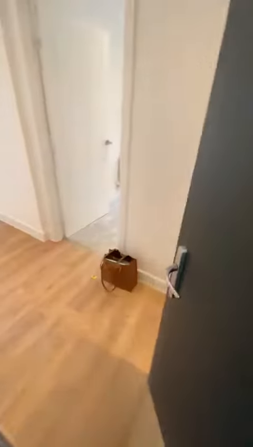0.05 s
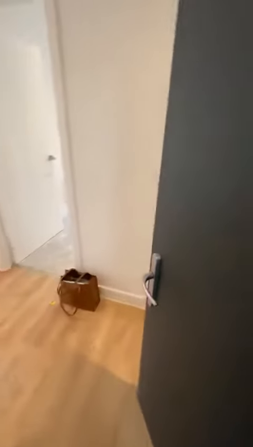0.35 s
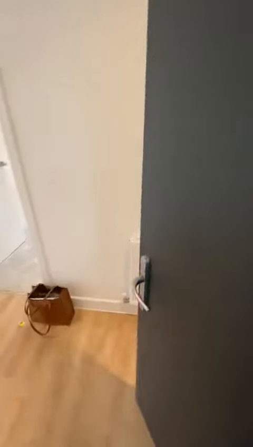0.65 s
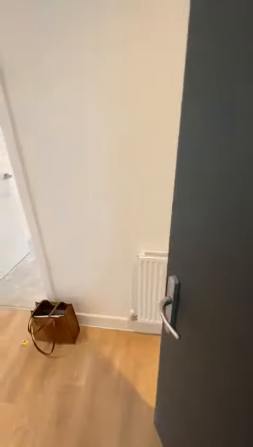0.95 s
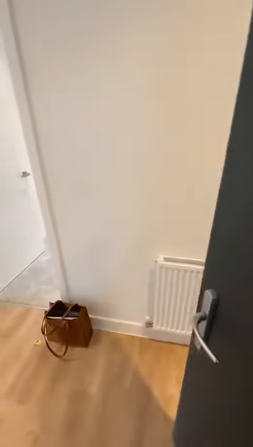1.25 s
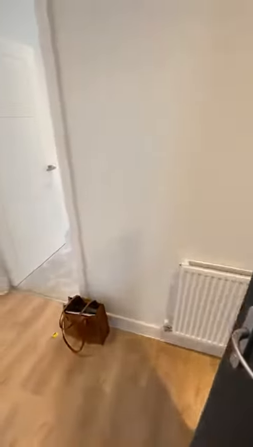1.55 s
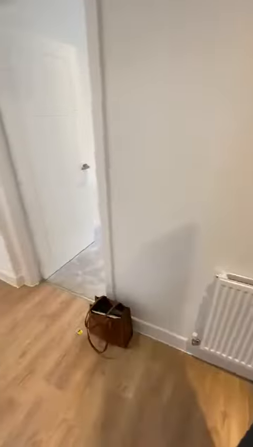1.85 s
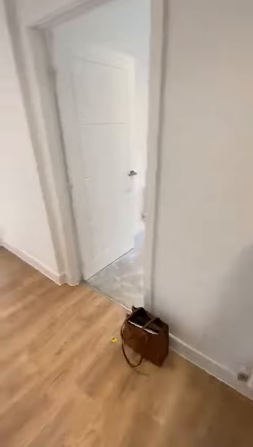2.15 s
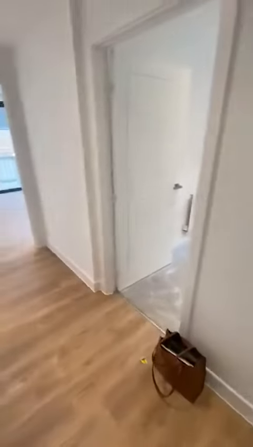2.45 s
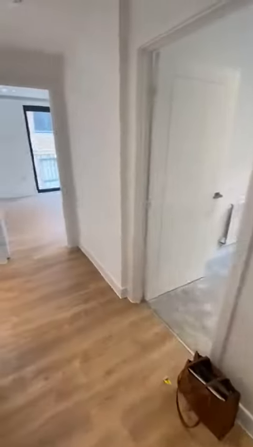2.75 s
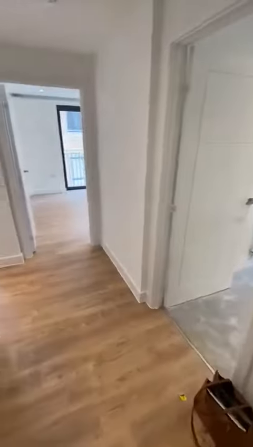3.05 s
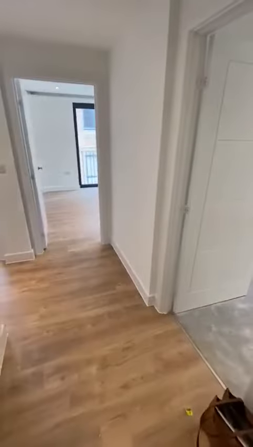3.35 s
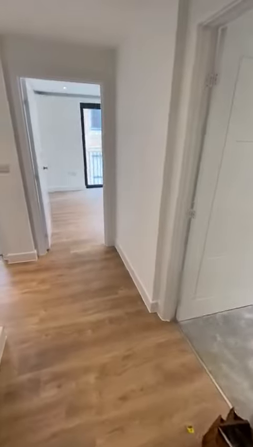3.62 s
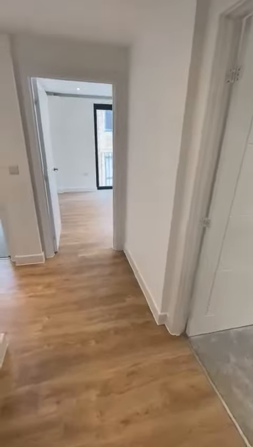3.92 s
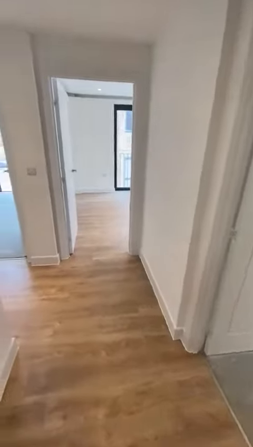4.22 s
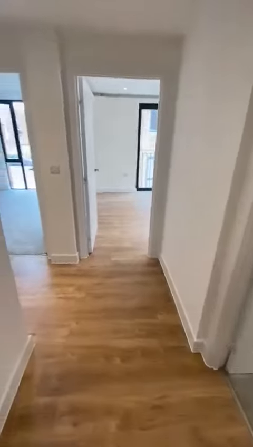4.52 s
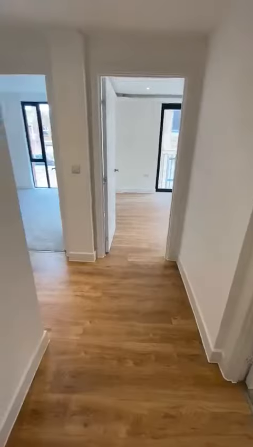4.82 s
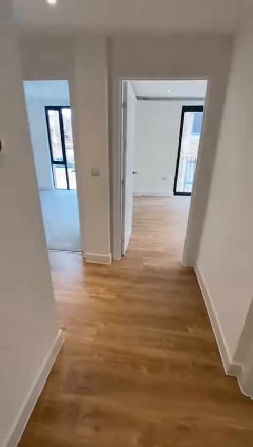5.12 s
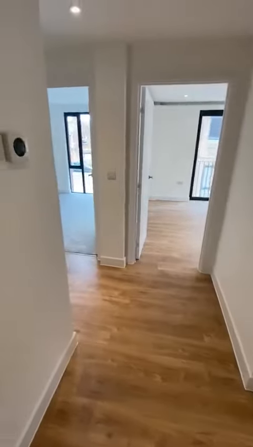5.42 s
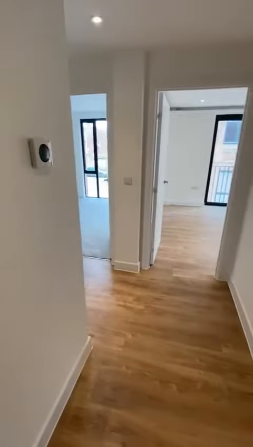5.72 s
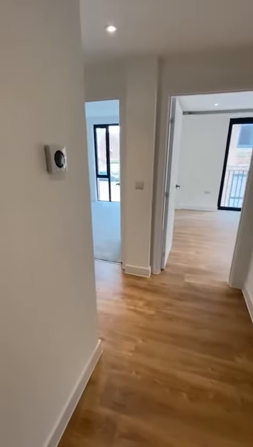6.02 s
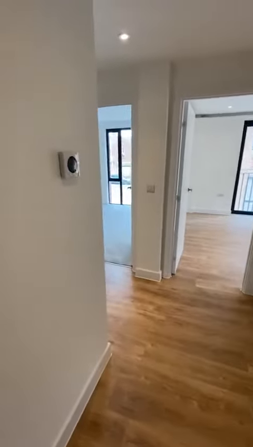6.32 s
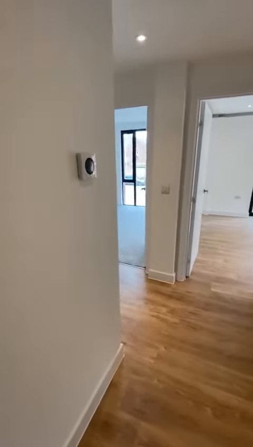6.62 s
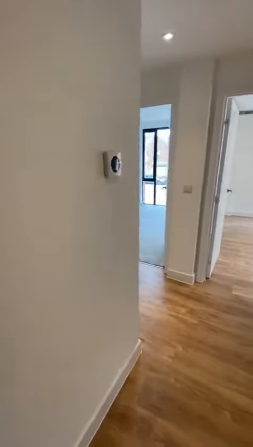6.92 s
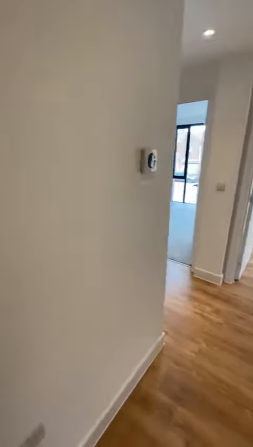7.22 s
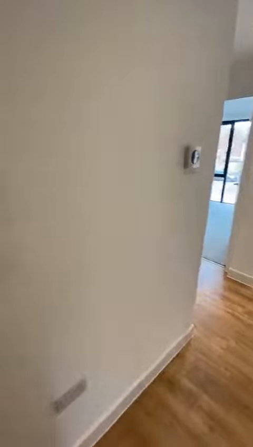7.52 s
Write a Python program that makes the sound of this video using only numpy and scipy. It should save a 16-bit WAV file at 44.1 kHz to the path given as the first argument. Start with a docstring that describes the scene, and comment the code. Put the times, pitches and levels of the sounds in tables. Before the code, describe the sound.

A front door clicks open, knocks three times, scrapes slowly shut and slams into its latch in an echoing hallway, with soft footsteps.

```python
"""A fan hums in a bare hallway with a hard floor. Someone carrying a phone works the lever handle
of a heavy front door, and the steel clacks back. The door is pushed open and, after two seconds,
knocks three times at the end of its swing. Then it sweeps slowly shut, its seal hissing and scraping
over the floor, while soft footsteps pass. Just after seven seconds it pushes a puff of air past
the phone and the latch slams home, metal on metal, echoing down the hallway."""
import sys
import numpy as np
from scipy import signal
from scipy.fft import rfft, irfft, next_fast_len
from scipy.io import wavfile

SR = 44100
rng = np.random.default_rng(int(sys.argv[2]) if len(sys.argv) > 2 else 0)


def wav_record(signal):
    """Record a signal, one row per channel, as 16-bit PCM in the file named by sys.argv[1]."""
    frames = np.transpose(np.atleast_2d(signal))
    bounded = np.clip(frames, -1, 1)
    # unit amplitude maps onto the largest positive 16-bit level
    quanta = np.round(bounded * 32767).astype(np.int16)
    wavfile.write(sys.argv[1], SR, quanta)


N = 342216
T = np.arange(N) / SR
SIZE = next_fast_len(N + SR, True)  # a spare second leaves space for echoes
FREQS = np.arange(SIZE // 2 + 1) * SR / SIZE

# Levels are relative: each layer gets its final loudness in the functions below.
# A TONE table says how strong a noise is at each pitch. MODES are the notes a struck thing rings with.
FAN_LEVELS = [(0.5, -61), (1.12, -69), (1.19, -53), (1.37, -57.5), (2.32, -60), (2.37, -48), (2.48, -52.5),
              (3.96, -48), (6.858, -53.5), (6.9, -55)]  # how loud the fan hums: time_s, level_db
AIR_TONE = [(25, -29), (50, 2), (85, 10.5), (130, -7), (240, -7), (500, -15.5), (1000, -34), (2500, -36.5),
            (3500, -39.5), (6000, -39), (11000, -46)]  # the rush of the fan's air: pitch_hz, level_db
ECHO_FADES = [(80, 0.8), (240, 1.08), (500, 0.78), (1000, 0.93), (2500, 0.79), (4000, 0.6), (6000, 0.63),
              (11000, 0.18)]  # how long the hallway's echo takes to fall 60 dB: pitch_hz, fade_s
HAND_BUMPS = [(.001, -15, 73.5), (.028, -26.5, 118), (0.097, -22, 77.6), (0.128, -25, 65), (0.277, -35, 93),
              (0.302, -32.5, 71.4), (0.348, -33.5, 69), (6.015, -36.5, 80), (6.166, -41, 97),
              (6.348, -37, 108)]  # the hand bumps the phone: start_s, level_db, pitch_hz
SLEEVE_BRUSHES = [(0, 0.0084, -52.5), (.08, 0.18, -68.5), (7.42, 0.19, -52.5), (7.6, 0.15, -59.5)]  # a sleeve brushes as the arm moves: start_s, length_s, level_db
CLOTH_TONE = [(400, 14.5), (1800, 14), (4000, 5.5), (6200, 2.5), (7500, -13), (11000, -8.5)]  # the rustling sleeve: pitch_hz, level_db
DRAUGHT_TONE = [(15, -14), (35, 1.5), (75, 2), (130, -23), (400, -27), (2000, -79)]  # air blowing on the phone: pitch_hz, level_db

FOOTSTEPS = [(0.056, -37.5, 225, -41), (0.255, -39, 244, -42.5), (0.388, -33, 107, -58),
             (0.887, -45.5, 261, -56.5), (1.118, -46, 250, -51.5), (1.146, -35.5, 88, -87),
             (1.499, -53.5, 153, -98), (3.128, -40.5, 147, -53.5), (3.619, -29.5, 144, -49.5),
             (4.313, -39.5, 161.6, -48.5), (4.6395, -26, 151.6, -39.5), (6.839, -50, 159, -47),
             (7.11, -43, 158, -40.5), (7.674, -37, 153.4, -50.5)]  # soft steps: start_s, thud_db, thud_pitch_hz, tap_db
SOLE_TONE = [(80, 6.5), (210, 9.5), (340, 5.5), (520, 4.5), (780, -2.5), (1200, -17), (2500, -27),
             (5500, -39), (11000, -40)]  # a sole tapping the floor: pitch_hz, level_db

SEAL_GLIDE = [(2.45, -74, -100), (2.65, -57.5, -56), (2.77, -60, -59.5), (2.921, -92, -93),
              (2.96, -71.5, -62), (3.18, -59, -57), (3.32, -65.5, -69), (3.44, -61.5, -56.5),
              (3.771, -59, -51.5), (3.92, -59, -82), (4.13, -58.5, -99), (4.42, -69.5, -93),
              (4.59, -87, -102), (4.6, -100, -111)]  # the door's seal glides in one long sweep: time_s, hiss_db, treble_db
SEAL_CATCHES = [(0.873, 0.031, -75, -90, -95), (1.006, .29, -62, -66.5, -68),
                (1.757, 0.062, -60.5, -85, -96), (2.749, 0.074, -51, -67, -66.5),
                (3.087, 0.18, -54, -75, -64.5), (3.398, 0.13, -58, -66, -66.5),
                (3.79, 0.076, -51, -58, -78), (4.07, 0.19, -61, -81, -69.5),
                (4.375, 0.05, -54.5, -87, -68.5), (4.53, 0.072, -57.5, -89, -99),
                (4.653, 0.021, -62, -65.5, -79), (4.788, 0.21, -58.5, -75.5, -73),
                (5.03, 0.2, -55, -78.5, -68), (5.21, 0.1, -53, -78.5, -78),
                (5.402, 0.13, -56, -75.5, -70.5), (5.536, 0.19, -49, -68.5, -60),
                (5.786, .14, -48.5, -62.5, -70), (5.972, 0.07, -49.5, -65, -71),
                (6.104, 0.072, -44.5, -66, -75), (6.257, .12, -45.5, -68.5, -60),
                (6.451, 0.06, -50, -71, -68), (6.474, 0.011, -62, -57.5, -68),
                (6.625, 0.18, -59, -75, -74.5), (6.871, 0.19, -51, -71.5, -61.5),
                (7.033, 0.42, -53, -67.5, -57)]  # it catches on the floor: start_s, length_s, scrape_db, hiss_db, rasp_db
SEAL_SNAPS = [(4.548, -46.5), (5.238, -35), (5.555, -43), (5.576, -46), (5.891, -36), (5.994, -48),
              (6.12, -51.5), (6.929, -37), (6.979, -32)]  # it sticks and snaps free: start_s, level_db
SCRAPE_TONE = [(100, -22.5), (300, 6.5), (430, 10.5), (560, 8), (780, 7), (1050, 0.5), (1300, -9.5),
               (1800, -7.5), (2300, -25), (3300, -25.5), (7000, -66)]  # the seal's hollow scrape: pitch_hz, level_db
RASP_TONE = [(500, -23), (900, 4.5), (1150, 4.5), (1600, 0), (2000, -14), (2400, -1), (3000, -17.5),
             (7000, -54)]  # its rough rasp: pitch_hz, level_db
HISS_TONE = [(600, -8), (1800, -3.5), (2400, 2), (3300, -3), (4500, -2), (6000, -1), (7500, -17),
             (10000, -9.5), (12000, -21.5)]  # its hiss: pitch_hz, level_db
TREBLE_TONE = [(5000, -18), (8000, -12), (9500, -16), (12000, -19.5)]  # the highest part of its glide: pitch_hz, level_db
FLICKER_BANDS = [700, 1100, 1600, 2300, 4000, 5000, 6100, 10000]  # parts of the rubbing sound that waver separately: pitch_hz
DRONE_MODES = [(78, 30, -2), (108, 18, 1), (150, 30, -6), (233, 13, 3), (390, 22, 3), (628, 26, -2),
               (700, 16, -6), (805, 40, 0), (1030, 35, -7), (1400, 200, -20), (2230, 120, -23)]  # the dragged door's resonances: pitch_hz, width_hz, level_db

# the door knocks once in its frame, then at the end of its swing: start_s, thud_db, rattle_db, thump_db
DOOR_KNOCKS = [(.378, -36.5, -45, -42), (2.095, -28.5, -48, -25), (2.212, -27, -36, -15.5),
               (2.326, -29, -39.5, -21.5)]
THUD_TONE = [(50, -33), (110, -4.5), (260, -0.5), (460, -7.5), (620, -16.5), (820, -15), (1100, -26.5),
             (2500, -33.5), (6000, -56)]  # the door's dull thud: pitch_hz, level_db
RATTLE_TONE = [(150, -31), (500, 3), (1000, 6.5), (1900, 5), (3100, 0), (4200, -7.5), (6100, -9.5),
               (7400, -26), (10000, -20), (12000, -50)]  # the wooden door rattling on its hinges: pitch_hz, level_db
DOOR_MODES = [(105, 2, .3), (150, 5, .22), (213.4, -12, .7), (263, -14.5, .35), (300, -12, .15),
              (377, -4.5, .22), (410.6, -9, .15), (451, -5.5, .24)]  # the ringing door panel: pitch_hz, level_db, fade_s

LATCH_STRIKES = [(.135, -68, -51), (0.379, -46.5, -46), (.391, -38, -38.5), (1.105, -47, -49),
                 (2.135, -39, -46), (7.215, -25.5, -38), (7.218, -23, -21), (7.223, -24, -30.5),
                 (7.231, -24, -20.5), (7.242, -29, -27)]  # handle and latch strike and shake the frame: start_s, metal_db, frame_db
BOLT_SLIDES = [(.368, 0.016, -49.5), (2.204, 0.011, -56), (2.317, 0.012, -52)]  # the bolt grinds along its plate: start_s, length_s, level_db
FITTING_TICKS = [(.108, -47, 5000, 3500), (0.1368, -39.5, 1700, 3000), (0.137, -27.5, 8800, 2000),
                 (0.381, -52, 9900, 3000), (0.3888, -29.5, 9500, 3030), (0.3909, -28, 3000, 4500),
                 (1.828, -33.5, 2540, 210), (2.07, -47.5, 4500, 6000), (2.136, -26.5, 5000, 2900),
                 (2.136, -25.5, 2300, 1700), (2.139, -30, 9700, 500), (2.21, -39, 9200, 1990),
                 (6.478, -37, 4370, 1590), (7.215, -11, 5700, 800), (7.215, -17.5, 8900, 3000),
                 (7.2175, 2, 2050, 800), (7.2228, -4, 1450, 900), (7.224, -16, 5960, 1200),
                 (7.2193, -1.5, 690, 450), (7.231, -3, 2100, 600)]  # sharp ticks of small parts: start_s, level_db, pitch_hz, width_hz
FRAME_TONE = [(60, -15), (160, 4), (370, 7), (600, 3), (800, 7), (1200, -25), (3000, -9.5), (8000, -25.5)]  # a blow on the frame: pitch_hz, level_db
METAL_TONE = [(100, -66), (400, -4), (1000, 2), (1400, 3.5), (2100, 5), (3000, 3), (4200, -3.5), (6100, -2),
              (7400, -29), (10000, -12.5), (12000, -49)]  # metal hitting metal: pitch_hz, level_db
FRAME_AND_LOCK_MODES = [(265, -11, 0.81), (364, 2.5, .14), (448, 3.5, 0.21), (578, -12, 0.51),
                        (716, -4, .2), (762, -3, 0.19), (838, -4, 0.19), (1100, -10, 0.14)]  # the ringing frame and lock case: pitch_hz, level_db, fade_s
HANDLE_MODES = [(1434, -7, .3), (1736, -3, .2), (1814, -4, .42), (2120, -2, .16), (2200, 2, .26),
                (2590, -5, .32), (2704, -7, .35), (3090, -10, .16), (3447, -10, .25), (3628, -9, .2),
                (4118, -10, .18), (5908, -7, .18), (6202, -12, .24), (6411, -11, .25), (6666, -13, .23)]  # the steel handle and its springs: pitch_hz, level_db, fade_s

MIC_SUM = [(2700, 0.5), (3250, -1.5), (3900, 2), (6800, 1), (7500, -10.5), (8500, -6.5), (9200, -0.5)]  # what the phone's two microphones share: pitch_hz, gain_db
MIC_DIFFERENCE = [(40, -46), (110, -34), (200, -29.5), (330, -15), (600, -2.5), (1100, -1), (2200, -2),
                  (3400, 3), (5500, -2.5), (6600, -1), (7500, 4.5), (8600, 0.5), (9600, -19)]  # what differs between the two: pitch_hz, gain_db
MIC_BALANCE = [(200, 0), (450, 1.5), (1100, 3.5), (2200, 1), (4000, -0.5), (8000, 0.5)]  # how much stronger the left one is: pitch_hz, left_minus_right_db
MIC_LAG = [(30, 0.095), (70, 0.0097), (200, 0.029), (500, 0.0005)]  # how far the left one trails in the bass: pitch_hz, lag_radians

WEIGHT_DELAY_S = 0.0183  # the door's full weight lands this long after its first touch


def undb(db):
    """Turn decibels into a number to multiply by."""
    return 10 ** (np.asarray(db) / 20)


def along(points, hz=FREQS):
    """Read between the rows of a (pitch_hz, value) table, with octaves evenly spaced."""
    pitch_hz, value = np.transpose(points)
    return np.interp(np.log(hz + 1), np.log(pitch_hz), value)


def filtered(sound, response):
    """Scale and shift each frequency of a sound by the given response."""
    return irfft(rfft(sound, SIZE) * response, SIZE)[..., :N]


def colour(sound, tone, taps=4096):
    """Give a sound the shape of a TONE table; plain noise keeps its power."""
    gain = undb(along(tone, np.linspace(0, SR / 2, taps // 2 + 1)))
    cepstrum = irfft(np.log(gain / np.sqrt(np.mean(gain ** 2))))
    # folding the second half onto the first makes the filter ring only after a hit, never before
    cepstrum[1:taps // 2] *= 2
    cepstrum[taps // 2 + 1:] = 0
    impulse = irfft(np.exp(rfft(cepstrum)))
    return signal.oaconvolve(sound, impulse[None], axes=1)[:, :N]


def resonance(hz, width_hz):
    """A response that passes one pitch fully and weakens those around it."""
    return 1j * FREQS * width_hz / (hz ** 2 - FREQS ** 2 + 1j * FREQS * width_hz)


def noise():
    """Separate noise for left and right."""
    return rng.standard_normal((2, N))


def wander(per_s):
    """A random curve that drifts around zero, mostly between -1 and 1."""
    turns = np.arange(0, T[-1] + 1, 1 / per_s)
    return 0.97 * np.interp(T, turns, rng.standard_normal(len(turns)))


def contact(loudness, spread=1.0, left_delay_samples=7):
    """Noise of two things touching: it reaches the left side late, and near walls scatter it."""
    source = rng.standard_normal(N)
    direct = np.array([np.roll(source, left_delay_samples), source])
    return loudness * (direct + spread * noise()) / np.hypot(1, spread)


def fader(times, levels_db):
    """A loudness curve that follows the given levels and dies away beyond both ends."""
    outside_s = np.maximum(times[0] - T, 0) + np.maximum(T - times[-1], 0)
    return undb(np.interp(T, times, levels_db)) * np.exp(-outside_s / 0.055)


def bursts(times, levels_db, fall_s):
    """A loudness curve for blows: each jumps up quickly and dies away."""
    out, age = np.zeros(N + SR), T[:SR // 2]
    shape = np.exp(-age / fall_s) - np.exp(-20 * age / fall_s)
    for start_s, db in zip(times, levels_db):
        out[int(start_s * SR):][:len(age)] += undb(db) * shape
    return out[:N]


def strokes(rows, swell_share=0.43, release_s=0.057):
    """A loudness curve for rubs (start_s, length_s, level_db): each swells, holds and lets go."""
    power = np.zeros(N)
    for start_s, length_s, db in rows:
        first = int(start_s * SR)
        age = T[:min(SR, N - first)]
        swell = np.sin(np.pi / 2 * np.minimum(age / (swell_share * length_s), 1))
        release = np.exp(-np.maximum(age - length_s, 0) / release_s)
        power[first:first + len(age)] += (undb(db) * swell * release) ** 2
    return np.sqrt(power)


def fade(age, fade_s, rise_s):
    """A loudness curve that rises, then falls by 60 dB every fade_s."""
    return (1 - np.exp(-age / rise_s)) * np.exp(-np.log(1000) * age / fade_s)


def ring(start_s, db, hz, fade_s, rise_s):
    """One note that is set going and dies away."""
    out, first = np.zeros(N), int(start_s * SR)
    age = T[:min(SR, N - first)]
    out[first:first + len(age)] = np.sin(2 * np.pi * hz * age) * fade(age, fade_s, rise_s)
    return undb(db) * out


def struck(times, levels_db, modes, scatter=0.0024):
    """A struck thing rings with several notes at once, a little out of tune at each blow."""
    hz, mode_db, fade_s = np.transpose(modes)[:, :, None]
    out, age = np.zeros(N + SR), T[:int(.6 * SR)]
    loudness = undb(mode_db) * fade(age, fade_s, rise_s=0.00019)
    tunings = 1 + scatter * rng.standard_normal((len(times), len(modes), 1))
    for start_s, db, tuning in zip(times, levels_db, tunings):
        notes = loudness * np.sin(2 * np.pi * hz * tuning * age)
        out[int(start_s * SR):][:len(age)] += undb(db) * np.sum(notes, axis=0)
    return out[:N]


def rebounds(blows, gaps_s, loss_db):
    """Add ever weaker bounces to blows (start_s, level_db, level_db) and return the three columns."""
    delays = np.cumsum([0, *gaps_s])
    rows = [np.array(blows) + [delay, *(-k * np.array(loss_db))] for k, delay in enumerate(delays)]
    return np.concatenate(rows).T


def fan(hum_hz=48.6):
    """A ventilation fan's low, wavering hum, louder inside the flat, over a faint rush of air."""
    times, levels_db = np.transpose(FAN_LEVELS)
    phase = 2 * np.pi * np.cumsum(hum_hz * (1 + .006 * wander(3))) / SR
    hum = np.sqrt(2) * np.sin(phase) * undb(np.interp(T, times, levels_db) + .6 * wander(4))
    air = colour(noise() * undb(wander(4.3)), AIR_TONE)
    return hum + undb(-57.5) * air


def hallway():
    """The response of the bare walls: dense echoes whose high pitches die first."""
    age = T[:int(1.3 * SR)]
    bands_hz = 62.5 * 2. ** np.arange(9)
    spectrum = rfft(rng.standard_normal((2, len(age))))
    octave = np.log2(np.arange(spectrum.shape[1]) * SR / len(age) + 1)
    echoes = 0
    for share, fade_s in zip(np.eye(len(bands_hz)), along(ECHO_FADES, bands_hz)):
        band = irfft(spectrum * np.interp(octave, np.log2(bands_hz), share), len(age))
        echoes = echoes + band * fade(age, fade_s, rise_s=0.00083)
    return rfft(echoes / np.sqrt(0.013 * SR), SIZE)


def handling():
    """The hand sends dull bumps through the phone's case, and a sleeve rustles."""
    bumps = sum(ring(start_s, db, hz, fade_s=.08, rise_s=.002) for start_s, db, hz in HAND_BUMPS)
    folds = undb(2 * wander(200))
    sleeve = colour(noise() * folds * strokes(SLEEVE_BRUSHES), CLOTH_TONE)
    return undb(1.5) * bumps + sleeve


def draught(peak_s=7.3, peak_db=-32.5, rise_db_per_s=99, fall_db_per_s=46.5):
    """The closing door pushes air past the phone: a low rumble that swells and ebbs."""
    below_peak_db = np.maximum(rise_db_per_s * (peak_s - T), fall_db_per_s * (T - peak_s))
    return colour(noise(), DRAUGHT_TONE) * undb(peak_db - below_peak_db)


def floorboards():
    """The floating floor gives under each step with a short, low thud."""
    return sum(ring(start_s, db + 9.5, hz, fade_s=.11, rise_s=.03) for start_s, db, hz, _ in FOOTSTEPS)


def shoes():
    """At each step the heel clicks and the sole taps; once a sole squeaks on the floor."""
    times, _, _, tap_db = np.transpose(FOOTSTEPS)
    sole = bursts(times, tap_db, fall_s=0.044)
    heel = bursts(times, tap_db, fall_s=0.0056)
    squeak = ring(start_s=4.39, db=-46.5, hz=692, fade_s=0.12, rise_s=0.0071)
    return colour(noise() * (sole + heel), SOLE_TONE) + squeak


def grit(clicks_per_s=450, strength=.42):
    """Grit crackles under the seal: scattered clicks of random size."""
    clicks = (rng.random(N) < clicks_per_s / SR) * rng.standard_normal(N)
    return strength * np.sqrt(SR / clicks_per_s) * clicks


def flicker(sound, depth_db=2.4, changes_per_s=40):
    """Each patch of the seal rubs with its own tone, so bands of pitch swell and sink separately."""
    bands = (signal.lfilter(*signal.iirpeak(hz, Q=3.5, fs=SR), sound + 1e-18) for hz in FLICKER_BANDS)
    return sound + sum(band * (undb(depth_db * wander(changes_per_s)) - 1) for band in bands)


def door_drone(drag, grip, pivot_db=-47, steepness=1.8):
    """The dragging seal makes the door drone, and the drone grows faster than the drag does."""
    # neighbouring modes of a panel swing in opposite directions
    panel = sum((-1) ** k * undb(db) * resonance(hz, width_hz)
                for k, (hz, width_hz, db) in enumerate(DRONE_MODES))
    push = undb(pivot_db) * (drag / undb(pivot_db)) ** steepness
    return filtered(contact(grip * push), panel / np.sqrt(np.mean(np.abs(panel) ** 2)))


def door_seal():
    """The seal catches and slips in tiny jerks: a hollow scrape, a rasp, a gritty hiss and a drone."""
    times, glide_db, treble_db = np.transpose(SEAL_GLIDE)
    starts, lengths, *level_columns = np.transpose(SEAL_CATCHES)
    drag, skid, bite = (strokes(zip(starts, lengths, db)) for db in level_columns)
    slip = np.hypot(skid, fader(times, glide_db + 2.5))
    grip = undb(1.5 * wander(400))
    snaps = bursts(*np.transpose(SEAL_SNAPS), fall_s=0.0028)
    scrape = colour(noise() * (grip * drag + snaps), SCRAPE_TONE)
    rasp = colour((noise() + grit()) * grip * bite, RASP_TONE)
    grain = undb(0.48 * wander(500) + 0.29 * wander(39))
    hiss = colour(contact(grain * slip, spread=0.64) + grit() * slip, HISS_TONE)
    treble = colour(noise() * grain * fader(times, treble_db - 3), TREBLE_TONE)
    drone = door_drone(drag, grip)
    rubbing = undb(-7.5) * scrape + undb(-1) * rasp + undb(-2) * hiss + treble
    return flicker(rubbing) + undb(0.5) * drone


def door_panel():
    """The door's weight lands with a low thump just after each knock, and its panel rings."""
    times, thud_db, _, thump_db = np.transpose(DOOR_KNOCKS)
    thumps = sum(ring(start_s + WEIGHT_DELAY_S, db, hz=170, fade_s=.06, rise_s=0.0036)
                 for start_s, db in zip(times, thump_db))
    return thumps + undb(-7.5) * struck(times, thud_db, DOOR_MODES)


def door_knocks():
    """The door thuds and rattles on its hinges, then again with less rattle as its weight lands."""
    touches = [row[:3] for row in DOOR_KNOCKS]
    times, thud_db, rattle_db = rebounds(touches, [WEIGHT_DELAY_S], loss_db=(3.5, 15.5))
    thud = colour(contact(bursts(times, thud_db, fall_s=0.0098)), THUD_TONE)
    rattle = colour(contact(bursts(times, rattle_db, fall_s=0.01)), RATTLE_TONE)
    return undb(6.5) * thud + undb(-0.5) * rattle


def bolt_chatter(bounces=4, first_gap_s=0.0045, slowing=1.4):
    """The sprung bolt bounces, weaker and slower each time; returns start_s, metal_db, frame_db."""
    return rebounds(LATCH_STRIKES, first_gap_s * slowing ** np.arange(bounces), loss_db=(2.5, 2.07))


def door_frame():
    """The frame knocks with every bounce of the bolt and rings after each main strike."""
    bounce_times, _, bounce_db = bolt_chatter()
    wood = colour(contact(bursts(bounce_times, bounce_db, fall_s=0.0089)), FRAME_TONE)
    strike_times, _, strike_db = np.transpose(LATCH_STRIKES)
    return undb(-7.5) * wood + undb(-12.5) * struck(strike_times, strike_db, FRAME_AND_LOCK_MODES)


def handle():
    """The steel handle and its springs ring on after each strike."""
    times, metal_db, _ = np.transpose(LATCH_STRIKES)
    return undb(-15.5) * struck(times, metal_db, HANDLE_MODES, scatter=.001)


def fittings():
    """Very short touches each make one small part of the door tick around its own pitch."""
    touch = contact(0.24)
    out = np.zeros((2, N))
    for start_s, db, hz, width_hz in FITTING_TICKS:
        first = int(start_s * SR)
        span = slice(first, first + SR // 20)
        tap = touch[:, span] * bursts([start_s], [db], fall_s=.0012)[span]
        peak = np.concatenate(signal.iirpeak(hz, hz / width_hz, fs=SR))
        out[:, span] += signal.sosfilt([peak, peak], tap)  # filtered twice for a clearer pitch
    return undb(17.5) * out


def latch():
    """The bolt grinds over its plate, and metal cracks on metal."""
    times, metal_db, _ = bolt_chatter()
    cracks = bursts(times, metal_db, fall_s=0.0035)
    return undb(-2.5) * colour(contact(cracks + strokes(BOLT_SLIDES)), METAL_TONE)


def scene():
    """Door and footsteps echo in the hallway; handling, draught and fan are added without echo."""
    # each pair is: sound, echo_db
    sources = [(door_knocks(), -5), (door_panel(), -14), (latch(), -7.5), (door_frame(), -10.5),
               (handle(), -14), (fittings(), -18), (shoes(), -8), (floorboards(), -17),
               (door_seal(), -13)]
    direct = sum(sound for sound, _ in sources)
    echoes = filtered(sum(sound * undb(echo_db) for sound, echo_db in sources), hallway())
    return direct + echoes + handling() + draught() + fan()


def record(dry, top_hz=11900):
    """Two close microphones hear almost the same bass, the left more midrange; the top treble is cut."""
    shared = filtered((dry[0] + dry[1]) / 2, undb(along(MIC_SUM)))
    difference = filtered((dry[0] - dry[1]) / 2, undb(along(MIC_DIFFERENCE)))
    left_right = np.array([shared + difference, shared - difference])
    lean_left = undb(along(MIC_BALANCE) / 2) * np.exp(-.5j * along(MIC_LAG))
    mics = filtered(left_right, np.array([lean_left, 1 / lean_left]))
    return signal.sosfilt(signal.ellip(10, .2, 70, top_hz, fs=SR, output="sos"), mics)


dry = scene()
out = record(dry)
wav_record(out)
```